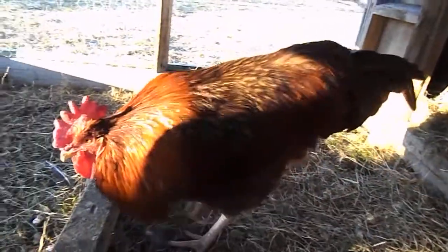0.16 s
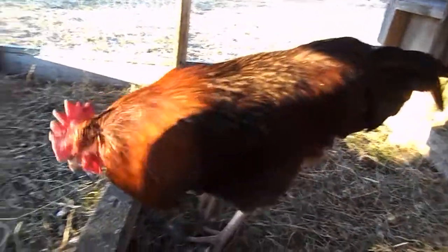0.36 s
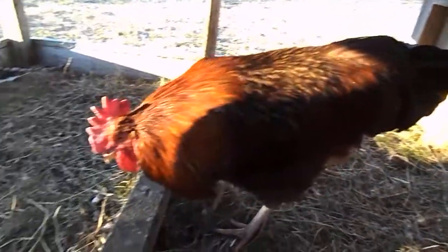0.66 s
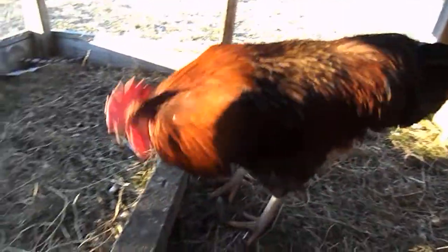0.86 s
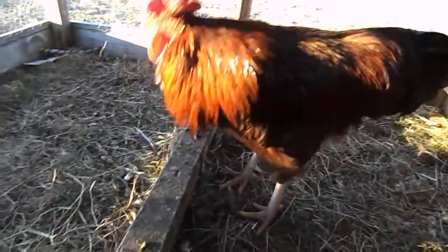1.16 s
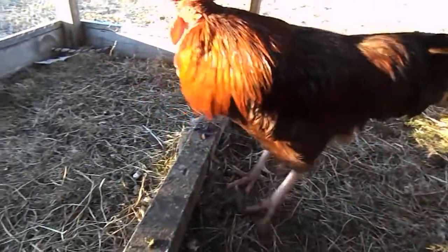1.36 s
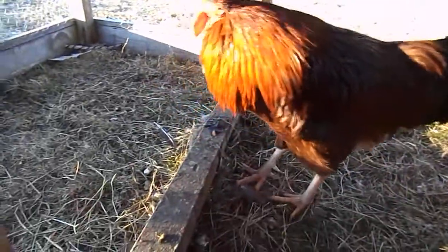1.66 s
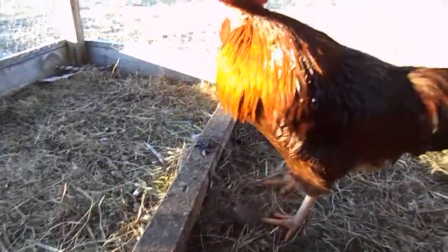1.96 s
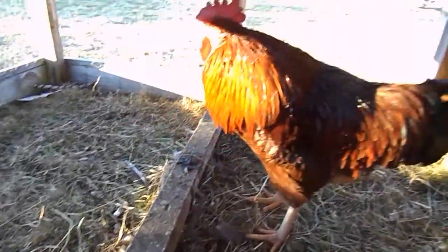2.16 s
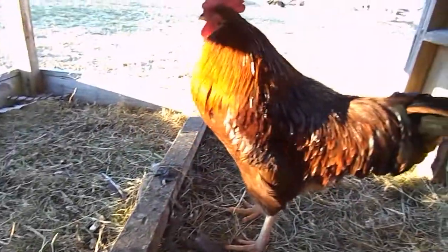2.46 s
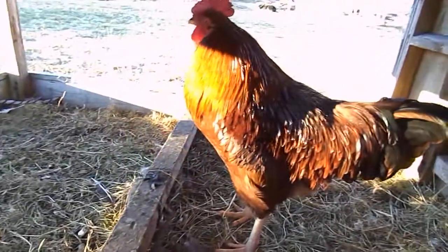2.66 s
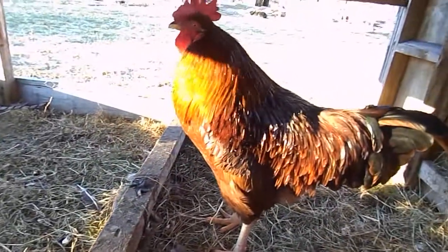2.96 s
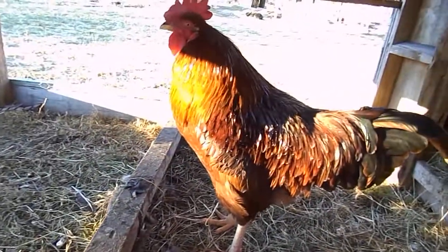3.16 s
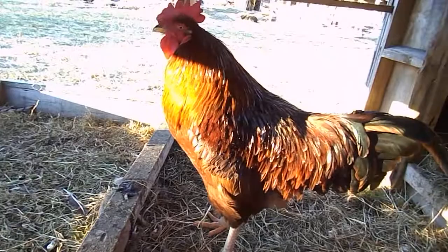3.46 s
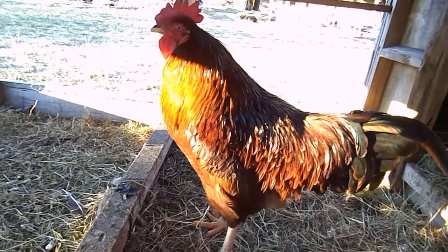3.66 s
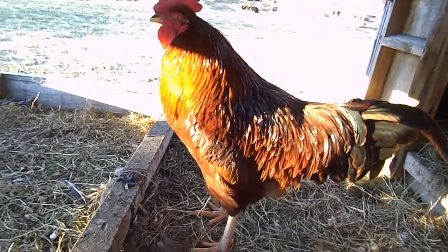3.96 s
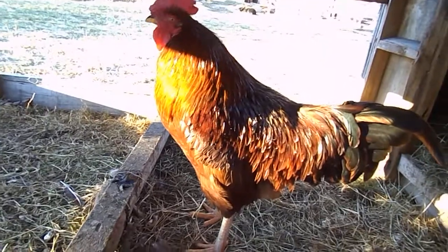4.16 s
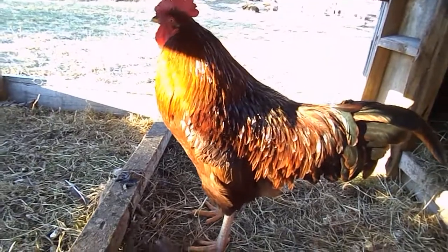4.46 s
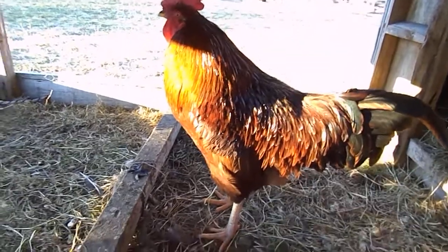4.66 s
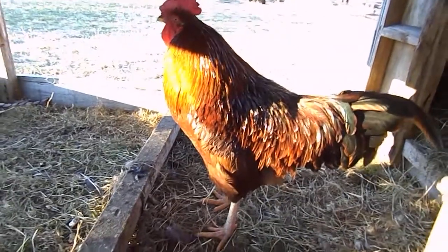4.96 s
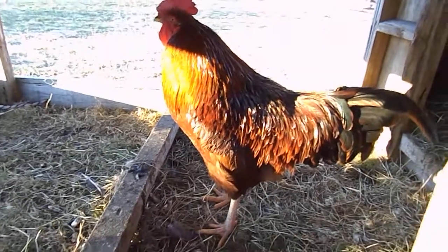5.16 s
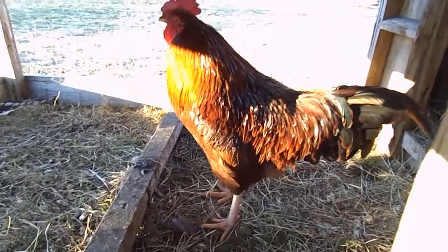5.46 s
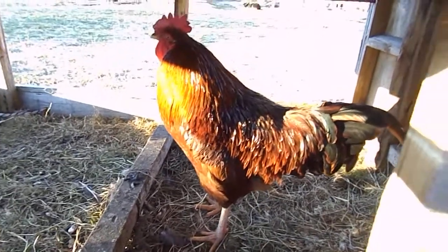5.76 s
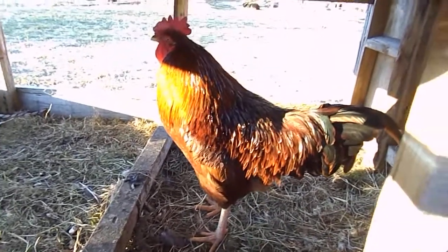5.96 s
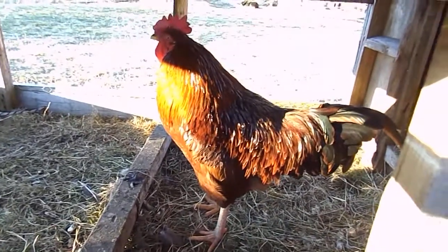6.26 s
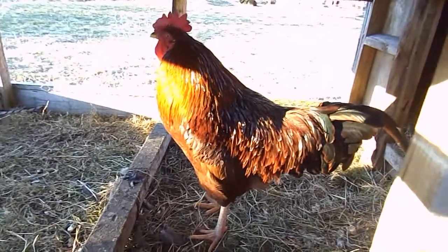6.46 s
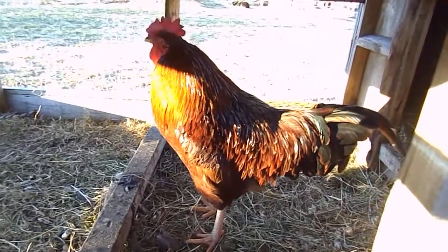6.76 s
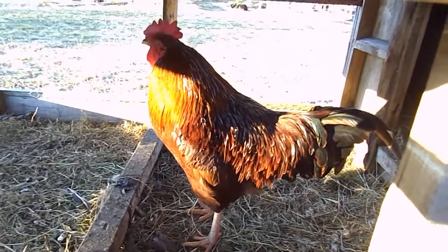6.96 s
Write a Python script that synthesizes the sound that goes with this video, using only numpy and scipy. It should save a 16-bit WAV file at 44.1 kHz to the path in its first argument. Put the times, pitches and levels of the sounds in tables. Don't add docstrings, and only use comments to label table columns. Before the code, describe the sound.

Close to the microphone, a rooster moves in dry straw inside a small open wooden pen. Uneven rustles and fine ticks come mostly from the left, with dull foot knocks and a soft creak. A very loud, bright snap bursts out just after one second. Rustling continues, thins out, then a cluster of wooden cracks comes past four seconds, followed by two sharp snaps and near quiet with faint hum and hiss.

```python
import sys
import numpy as np
from scipy import signal
from scipy.io import wavfile
from scipy.ndimage import uniform_filter1d

SR = 44100
rng = np.random.default_rng(int(sys.argv[2]) if len(sys.argv) > 2 else 0)


def attenuation_scalar(level_db):
    decades = np.asarray(level_db, float) / 20
    return 10 ** decades


def wav_record(signal):
    frames = np.transpose(np.atleast_2d(signal))
    bounded = np.clip(frames, -1, 1)
    quanta = np.round(bounded * 32767).astype(np.int16)
    wavfile.write(sys.argv[1], SR, quanta)


N = 313630
RIGHT_LATE = 3
LEFT_RIGHT = np.array([[0.5], [-0.5]])

# frequency in Hz, density in dB per Hz.
CRACKLE = [(60, -77), (350, -28), (600, -11.5), (2430, -3.5), (3120, -3.5), (4430, 1), (5380, -0.5),
           (9820, -1.5), (11100, -3.5), (14900, -10.5), (16900, -17)]


def evened(x):
    return x / np.sqrt(np.mean(x ** 2) + 1e-20)


def read(points, hz):
    f, value = np.transpose(points)
    return np.interp(np.log(hz + 1), np.log(f + 1), value)


def colour(x, spectrum):
    hz = abs(np.fft.fftfreq(2048, 1 / SR))
    log_gain = np.log(attenuation_scalar(np.maximum(read(spectrum, hz), -100)))
    taps = np.fft.ifft(np.exp(np.conj(signal.hilbert(log_gain)))).real[:1024]
    taps = taps.reshape((1,) * (x.ndim - 1) + (-1,))
    return signal.oaconvolve(x, taps, axes=-1)[..., :x.shape[-1]]


def resonate(x, hz, width_hz):
    turn = np.exp(2j * np.pi * np.cumsum(hz * np.ones(x.shape[-1])) / SR)
    r = np.exp(-np.pi * width_hz / SR)
    return 2 * (turn * signal.lfilter([1 - r], [1, -r], x / turn)).real


def highpass(x, hz, order):
    return signal.sosfilt(signal.butter(order, hz, btype="high", fs=SR, output="sos"), x)


def lowpass(x, hz, taps):
    return signal.oaconvolve(x, signal.firwin(taps, hz, window=("kaiser", 9), fs=SR)[None], "same")


def add(mix, s, sound, peak_db, pan_db):
    part = mix[:, round(s * SR):][:, :sound.shape[1]]
    sound = sound * attenuation_scalar(LEFT_RIGHT * pan_db)
    peak = np.sqrt((sound ** 2).mean(0).max())
    part += (sound / peak * attenuation_scalar(peak_db + 3.0))[:, :part.shape[1]]


def pair(z, same):
    same = np.clip(same, 0, 1)
    return same * z[0] + np.sqrt(1 - same ** 2) * z[1:]


def motion():
    # time in seconds, motion in dB, weight on the straw in dB,
    # left-right difference in dB.
    restless = [(0, -48.5, -5, 11), (.16, -51, -5.5, 2), (.38, -46, -8.5, 9.5), (.8, -45.5, -2, 8.5),
                (1.1, -47.5, 6, 4.5), (1.37, -50.5, 2.5, 3), (1.7, -46.5, -2, 2.5), (2.04, -43.5, -13, 4.5),
                (2.26, -54.5, 3.5, 7), (2.9, -60.5, 1.5, 2), (3.6, -57.5, 0, 3.5), (4.05, -58.5, 4, 1.5),
                (4.45, -55.5, -2, 4.5), (4.8, -59.5, 5, 2), (5.2, -50, 3.5, 3), (5.62, -51.5, -1, 3.5),
                (6.2, -59, 2, 2.5), (7.11, -65, 7, 0)]
    # start in seconds, length in seconds, more motion in dB,
    # more weight in dB, further left in dB.
    foot_shuffles = [(0.167, 0.16, 11.5, -11, 1), (0.435, 0.15, 1.5, -3, -4), (0.553, 0.28, 2.5, -1, 0.5),
                     (0.814, 0.3, 6.5, 3, 0.5), (1.228, 0.089, 2, 8, 5), (1.474, 0.27, 6.5, 1, 7),
                     (1.763, 0.12, 4.5, 0.5, 1.5), (2.027, 0.19, 1, 9.5, 1.5), (2.44, 0.15, 5, -6.5, 2.5),
                     (2.575, 0.1, 5, 0.5, 8), (3.19, 0.17, 2.5, -4, 6), (3.697, 0.34, 3.5, 0, -2),
                     (4.187, 0.085, 11.5, 4, 11), (4.469, 0.15, 9.5, 3, -3), (4.568, 0.23, 12, -0.5, -1),
                     (4.934, 0.15, 6.5, -6.5, 2), (5.203, 0.096, 0.5, -4, 0), (6.497, 0.3, 6, -3, -2)]
    rise = 0.31
    t = np.arange(N) / SR
    s, *columns = np.transpose(restless)
    out = np.array([np.interp(t, s, column) for column in columns])
    for start, length, *more in foot_shuffles:
        swing = np.interp(t, start + length * np.array([0, rise, 1]), [0, 1, 0])
        out += np.outer(more, swing)
    return out


def grains(per_s, spread_db, clump_db, same, spectrum):
    clumps = attenuation_scalar(clump_db * evened(uniform_filter1d(rng.standard_normal(N), 300)))
    size = attenuation_scalar(spread_db * np.minimum(rng.exponential(1, (3, N)), 5))
    size = size * (rng.random((3, N)) < per_s / SR)
    slips = pair(size * rng.standard_normal((3, N)), same) * clumps
    return evened(colour(slips, spectrum))


def rustle():
    # frequency in Hz, density in dB per Hz.
    leaf_tone = [(1760, -30.5), (3000, -11), (4840, -9.5), (5990, -8.5), (7420, -5), (8030, -5),
                 (12600, -4), (16000, -8), (16500, -58)]
    stalk_tone = [(1200, -26.5), (2200, -5), (4000, -4), (6000, -7), (9000, -14)]
    bedding_tone = [(35, -77.5), (60, -62), (252, -6), (319, -1.5), (356, -3), (822, -5.5), (1160, -3.5),
                    (1360, -7), (2220, -11), (2600, -25.5), (3380, -24), (5720, -120)]
    still_db, push_db = -56.5, -60.5
    leaf_db, weight_db, pan_db = motion()
    stalk_db = leaf_db + weight_db - 5
    bedding_db = push_db + 0.78 * (leaf_db - still_db) + 0.52 * weight_db
    side = LEFT_RIGHT * pan_db
    leaves = attenuation_scalar(leaf_db + side) * grains(7000, 3.04, 1.26, 0.49, leaf_tone)
    stalks = attenuation_scalar(stalk_db + 0.66 * side) * grains(3500, 0.79, 1.4, 0.25, stalk_tone)
    bedding = attenuation_scalar(bedding_db + side) * grains(3000, 2.15, 1.44, 0.71, bedding_tone)
    return leaves + stalks + bedding


def snap(hz, broad_db, break_ms, tail_db, tail_ms, crackle):
    ms = np.arange(2600) * 1000 / SR
    burst = ms / break_ms * np.exp(-ms / break_ms * 2)
    direct = pair(rng.standard_normal((3, len(ms))), 0.44) * burst
    first, click = np.argmax(burst), np.linalg.norm(burst) / (1 + break_ms)
    direct[0, first] += 1.18 * click
    direct[1, first + rng.integers(6)] += 0.89 * click
    scatter = resonate(pair(rng.standard_normal((3, len(ms))), 0.54), 2500, 7000)
    tail = attenuation_scalar(tail_db - 60 * ms / tail_ms) * (1 - np.exp(-ms / 1.3))
    drive = direct + scatter * tail
    ring = resonate(drive, hz, hz / (4.7 + 1.7 * break_ms))
    ring = resonate(ring, hz, 1.1 * hz)
    return evened(ring) + attenuation_scalar(broad_db) * evened(colour(drive, crackle))


def stem_cracks():
    # start in seconds, peak in dB, ring in Hz,
    # length of the break in ms, left-right difference in dB.
    ringing = [
        (.412, -20, 10800, .42, 15),
        (1.2763, -7, 4470, 0.51, 0.5),
        (1.2777, -17, 4320, 1.6, -6),
        (1.2824, -18, 12600, 0.84, -4),
        (1.2834, -22, 9000, 1.7, 9),
        (1.6749, -15.5, 10700, 1.4, 0),
        (2.0411, -22.5, 3650, 0.33, 15),
        (4.5402, -18.5, 10100, 1.2, -4),
    ]
    shattering = [(.0075, -28, 12100, .4, 9), (.391, -18.5, 10390, 0.45, 26), (.853, -25, 2640, 2.8, 9),
                  (1.2645, -14.5, 2930, 4.0, 1), (1.2695, -22, 3960, 3.2, -6),
                  (1.291, -19.5, 4560, .34, 11), (1.6447, -15.5, 4220, 0.39, 24),
                  (1.6644, -20, 8800, 2.5, 17), (2.2886, -24.5, 3800, .49, 14),
                  (4.5293, -25, 11900, 0.85, -2), (5.0716, -14, 8400, 0.8, -2),
                  (5.3322, -12.5, 3700, 0.83, 6.5)]
    out = np.zeros((2, N))
    for stems, broad_db in ((ringing, -6), (shattering, 6)):
        for s, db, hz, break_ms, pan_db in stems:
            add(out, s + 0.00064, snap(hz, broad_db, break_ms, -31.5, 39, CRACKLE), db, pan_db)
    return out


def slat_cracks():
    # start in seconds, peak in dB, ring in Hz, length of the break in ms,
    # left-right difference in dB.
    breaks = [
        (4.1215, -17, 3770, 1.26, -3),
        (4.151, -13.5, 3860, 0.89, -1.5),
        (4.157, -23.5, 4750, 1.5, -2),
        (4.2049, -11, 3260, 1.04, -1),
        (4.2108, -32, 3620, 1.6, -10),
        (4.215, -41, 3480, 7.5, 0),
        (4.53, -12, 3200, 3.4, -6),
        (4.5416, -21.5, 3180, 3.2, 1),
    ]
    # frequency in Hz, density in dB per Hz.
    splinter = [(60, -97), (300, -16), (600, -9), (1710, -5.5), (2390, -20), (3120, -1), (4370, -3),
                (6830, -2.5), (7960, -11), (15800, -15), (16900, -54)]
    out = np.zeros((2, N))
    for s, db, hz, break_ms, pan_db in breaks:
        splinter_db = 14.5 + 0.7 * db
        add(out, s + 0.00055, snap(hz, splinter_db, break_ms, -31.5, 51, splinter), db, pan_db)
    return out


def ping(hz, swell_ms):
    ms = np.arange(3000) * 1000 / SR
    note = ms * np.exp(-ms / swell_ms) * np.sin(2 * np.pi * hz * ms / 1000)
    return np.array([np.roll(note, shift=RIGHT_LATE), note])


def struck_notes():
    # start in seconds, peak in dB, frequency in Hz, swell in ms, left-
    # right difference in dB.
    struck = [(1.2767, -4.5, 4400, .2, 0), (1.278, -13, 4260, 0.4, 0), (1.2792, -20.5, 3600, .5, 4),
              (1.2828, -6, 12900, .22, 8.5), (1.2845, -27, 9170, 0.55, 0), (1.2785, -21, 8040, .6, 0),
              (1.277, -19, 6500, 0.21, 2), (1.2828, -20, 10300, .2, 0), (4.1222, -24.5, 3840, 0.58, -1),
              (4.1222, -26.5, 5200, .5, 0), (4.1514, -22, 3840, 0.69, 7), (4.1512, -26, 6750, 0.66, 2),
              (4.2054, -21.5, 3140, 0.63, 0), (4.2054, -23, 4800, 0.37, -9), (4.2052, -21.5, 5400, 0.54, -4),
              (4.2053, -25, 6800, 0.52, 2), (5.0716, -25, 6000, 0.43, 10), (5.072, -31.5, 3750, 0.52, 6),
              (5.2388, -34, 7500, .1, 11), (5.3329, -15.5, 5480, 0.3, 6), (5.333, -24, 3870, 0.71, 14),
              (5.3332, -20, 8200, .2, -6), (5.3328, -26, 11000, 0.28, -4), (.8775, -33, 1800, 0.32, 9),
              (.8862, -35, 3400, .3, 7), (.962, -38, 2300, .4, 7), (1.9312, -38, 4400, .12, 7),
              (2.2888, -36, 5300, 0.14, 10), (6.562, -45.5, 6900, 0.37, -2), (1.6754, -16, 10670, .2, -2),
              (1.6765, -28, 4030, 0.32, 3), (2.3, -31, 6000, .12, 10), (1, -32.5, 5000, .3, 4),
              (4.5305, -28, 6660, .5, 0), (4.5195, -40, 3700, .4, 0), (5.31, -41, 12000, .1, 5),
              (5.756, -42, 13000, .1, 5), (1.7462, -34, 2340, .25, 12), (2.338, -42, 3500, 0.14, 11),
              (1.272, -31.5, 345, 7.0, -3), (1.27, -28, 1115, 5.8, 0), (1.6745, -33, 1800, 2.2, -1),
              (1.676, -39, 1044, 3.5, 2), (1.5, -38, 570, 0.75, 15), (2.2885, -44, 610, .8, 15),
              (4.122, -33, 1760, 1.4, 17), (4.152, -42, 450, 2.0, 5), (4.1225, -40, 430, 2.0, 5),
              (1.7465, -41, 1000, .6, 12), (1.836, -41, 1500, .4, 15), (1.9315, -41, 1300, .5, 5),
              (4.206, -41, 326, 3.0, 3), (6.559, -45, 800, 1.5, 0), (5.3335, -27, 2280, .8, 5),
              (5.333, -27, 14500, .3, 0), (4.2055, -34, 568, 2.2, 2), (4.532, -35.5, 1010, 1.6, 5),
              (6.649, -43.5, 1210, 1, -1), (6.568, -51.5, 330, 6.4, 0)]
    out = np.zeros((2, N))
    for s, db, hz, swell_ms, pan_db in struck:
        add(out, s, ping(hz, swell_ms), db, pan_db)
    return out


def stalk_ticks():
    # start in seconds, peak in dB, left-right difference in dB.
    thin_stalks = [(.0495, -36, 1), (.193, -40, 3), (.2907, -26.5, 4), (.314, -31, 8), (.3444, -36, 9.5),
                   (0.4312, -24, 9.5), (.4549, -33, 8.5), (0.4774, -28, 6), (.586, -27, 7), (.712, -23, 19),
                   (.9044, -33, 10), (1.6123, -33, -2.5), (1.809, -33, 4), (1.8356, -29, 12),
                   (1.9165, -37, -4), (2.1066, -35, 2), (2.132, -28, 7), (2.18, -29, 18),
                   (2.4742, -32.5, 20), (2.6233, -22, 24), (2.7508, -37.5, 11), (3.173, -43, 10),
                   (3.24, -31.5, 9), (3.3159, -34, 9), (4.277, -36, 12), (4.43, -41, 5.5),
                   (4.6997, -31, 14), (4.988, -30, 11), (5.6765, -37, 6.5), (6.562, -38, -5)]
    # start in seconds, peak in dB, ring in Hz, left-right difference in dB.
    thick_stalks = [(0.3314, -27.5, 8150, 10), (.6403, -24.5, 7990, 19), (0.8576, -22.5, 2170, 0),
                    (.9394, -32, 2820, 18), (0.997, -24, 5040, 7), (1.0473, -24, 7190, 12),
                    (1.0628, -27, 5200, 6), (1.1179, -27, 4740, 27), (1.1942, -28, 7660, 0),
                    (1.5419, -26.5, 3760, 15), (1.5513, -26, 3270, 22), (1.6915, -28, 7780, 7),
                    (1.7463, -32, 2850, 17), (1.931, -32, 2420, 9), (2.0704, -24, 2820, 11),
                    (2.3097, -32, 6700, 15), (2.7029, -33, 7200, 13), (3.6651, -32, 4950, 2),
                    (3.7382, -29, 8590, 20), (4.245, -37, 7000, 6), (4.6404, -40, 5170, 5),
                    (5.0414, -35, 5650, 4.5), (5.239, -21.5, 7960, 3.5), (2.486, -28.5, 9000, 12),
                    (4.6125, -34, 11500, 7), (1.634, -29, 4000, 8)]
    thin_rung = [(s, db, 10300 * (1 + 0.15 * rng.uniform(-1.9, 1)), pan_db) for s, db, pan_db in thin_stalks]
    out = np.zeros((2, N))
    for s, db, hz, pan_db in [*thin_rung, *thick_stalks]:
        add(out, s + 0.0006, snap(hz, 0.99, 0.3, -31, 26, CRACKLE), db, pan_db)
    return out


def knock(hz, t60_ms):
    ms = np.arange(4000) * 1000 / SR
    swell = attenuation_scalar(-60 * ms / t60_ms) * (1 - np.exp(-ms / 0.43))
    puff = pair(rng.standard_normal((3, len(ms))), 0.51) * swell
    puff[:, 12] += 0.63 * np.linalg.norm(puff[0])
    ring = resonate(resonate(puff, hz, 0.62 * hz), hz, 2.5 * hz)
    return highpass(ring, 0.8 * hz, 2)


def footfalls():
    # start in seconds, peak in dB, ring in Hz, left-right difference in dB.
    dull = [(0.478, -37, 407, 0), (.853, -27.5, 1130, 10), (.876, -31, 790, 10), (0.916, -36, 1130, 5),
            (.994, -35, 750, 16), (1.062, -38, 373, -1), (1.177, -40.5, 277, -4), (1.642, -26, 800, 21),
            (1.677, -36, 1030, -2), (1.744, -29, 1760, 20), (1.834, -34, 1260, 25), (1.93, -38, 1230, 2),
            (2.04, -29.5, 595, 25), (2.069, -33, 457, 20), (2.287, -30.5, 1170, 21), (3.238, -33, 980, 22),
            (3.662, -37, 1580, 25), (4.1205, -28, 724, 51), (4.152, -27.5, 1680, 19), (4.204, -31, 477, 1),
            (4.542, -33, 1180, 17), (5.069, -32.5, 397, 15), (5.579, -49, 291, -2), (6.169, -52, 290, -4),
            (6.556, -44, 673, 3)]
    # start in seconds, peak in dB, ring in Hz,
    # decay by 60 dB in ms, left-right difference in dB.
    bodies = [(.853, -33, 322, 150, -4), (1.267, -22, 1998, 40, 13), (1.273, -29, 360, 97, -6),
              (1.2762, -20, 1140, 48, 26), (1.28, -25.5, 283, 83, -2), (4.207, -33.5, 1050, 62, 18),
              (4.2271, -31, 900, 7.7, 18), (4.528, -24, 1210, 14, 13), (5.42, -52, 131, 73, 9),
              (5.46, -52, 107, 45, 24), (5.649, -58, 131, 65.0, 12), (6.06, -64, 80, 80.0, 8),
              (6.6467, -43.5, 556, 20, -3), (6.648, -51, 1250, 17, 3)]
    out = np.zeros((2, N))
    for s, db, hz, pan_db in dull:
        add(out, s + 0.002387, knock(hz, 9), db, pan_db)
    for s, db, hz, t60_ms, pan_db in bodies:
        add(out, s + 0.002363, knock(hz, t60_ms), db, pan_db)
    return out


def rubs():
    # start in seconds, end in seconds, frequency in Hz,
    # width in Hz, level in dB.
    dragged = [
        (0.857, 1.08, 6750, 800, -46),
        (1.24, 1.275, 7850, 600, -39),
        (1.262, 1.292, 1074, 110, -26),
        (1.35, 1.65, 1300, 860, -48.5),
        (5.304, 6.16, 3300, 960, -61),
        (5.3, 6.18, 4600, 1200, -59.5),
        (3.797, 3.95, 5300, 1200, -56),
        (4.489, 4.616, 3260, 300, -57),
        (1.672, 1.688, 1900, 250, -48),
               (.857, .868, 6700, 500, -38), (.895, .91, 6200, 600, -45), (.975, .99, 6900, 500, -41),
               (1.035, 1.065, 6800, 600, -45), (1.04, 1.085, 1160, 250, -46.5), (.94, .97, 447, 250, -44.5),
               (5.1, 6.1, 13000, 6000, -55), (5.15, 5.95, 8500, 5000, -56), (5.25, 5.7, 4200, 1500, -60),
               (.62, .665, 2500, 120, -56), (.57, .77, 1270, 200, -55)]
    out = np.zeros((2, N))
    for start, end, hz, width_hz, db in dragged:
        z = pair(rng.standard_normal((3, SR)), 0.6)[:, :round((end - start) * SR)]
        band = evened(resonate(resonate(z, hz, width_hz), hz, width_hz))
        out[:, round(start * SR):][:, :z.shape[1]] += attenuation_scalar(db) * band * np.hanning(z.shape[1])
    return out


def creak(path, throb, wobble):
    s, hz, db = np.transpose(path)
    t = np.arange(N) / SR
    waver, rough = (evened(uniform_filter1d(row, 200)) for row in rng.standard_normal((2, N)))
    turns = np.cumsum(np.interp(t, s, hz) * (1 + wobble * waver)) / SR
    level = attenuation_scalar(np.interp(t, s, db, -120, -120) + 3.1 * rough)
    level = level * (1 - throb + throb * np.cos(2 * np.pi * 52 * t))
    tone = level * np.sin(2 * np.pi * turns) + 64.0 * level ** 2 * np.sin(3.9 * np.pi * turns)
    return tone * attenuation_scalar(3 * LEFT_RIGHT)


def slat_creaks():
    # time in seconds, pitch in Hz, level in dB.
    soft_creak = [
        (.55, 1220, -66),
        (.59, 1233, -56),
        (.635, 1285, -44.5),
        (.67, 1289, -49.5),
        (.7, 1310, -48.5),
        (.74, 1280, -50),
        (.78, 1270, -62),
    ]
    groan = [
        (1.41, 1560, -62),
        (1.435, 1600, -45),
        (1.47, 1600, -51),
        (1.51, 1600, -47),
        (1.54, 1510, -53),
        (1.58, 1470, -62),
    ]
    return creak(soft_creak, 0.2, 0.03) + creak(groan, 0.77, 0.012)


def field():
    # frequency in Hz, density in dB per Hz.
    hum_tone = [(15, -57), (25, -33), (44, -43), (96, -25), (144, -15), (260, 1), (340, -2.5), (523, -4),
                (997, -6), (2420, -15.5), (5010, -18), (11800, -20.5), (15500, -25.5)]
    # frequency in Hz, likeness from 0 to 1.
    likeness = [(60, 0.78), (180, 0.76), (550, 0.84), (1650, 0.2), (4970, 0.021), (15000, 0.044)]
    frames, hz = N // 256 + 5, np.fft.rfftfreq(1024, 1 / SR)
    a, b, c, d, patches = rng.standard_normal((frames, 513, 5)).T
    patches = evened(uniform_filter1d(uniform_filter1d(patches, 10, 0), 12, 1))
    same = np.clip(read(likeness, hz), -1, 1)[:, None]
    left = a + 1j * b
    right = same * left + np.sqrt(1 - same ** 2) * (c + 1j * d)
    z = np.array([left, right]) * attenuation_scalar(read(hum_tone, hz)[:, None] + 2.2 * patches)
    hum = evened(signal.istft(z, nperseg=1024, noverlap=768)[1][:, :N])
    whine = attenuation_scalar(-71.0) * np.sin(2 * np.pi * 11721.0 * np.arange(N) / SR)
    return attenuation_scalar(-55.5) * hum + whine


def scene():
    loud = stem_cracks() + slat_cracks() + struck_notes()
    loud = highpass(loud, 120, 4)
    soft = rustle() + stalk_ticks() + footfalls() + rubs() + slat_creaks() + field()
    return loud + lowpass(soft, 15870, 511)


def top_cut(x):
    return signal.sosfilt(signal.butter(12, 17090, fs=SR, output="sos"), x)


def record(dry):
    late = np.array([dry[0], np.roll(dry[1], shift=RIGHT_LATE)])
    mix = lowpass(highpass(late, 90, 2), 16950, 255)
    return top_cut(np.clip(mix, -1, 1))


dry = scene()
out = record(dry)
wav_record(out)
```